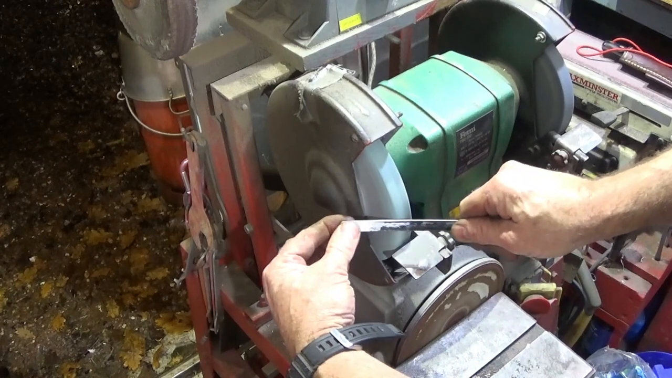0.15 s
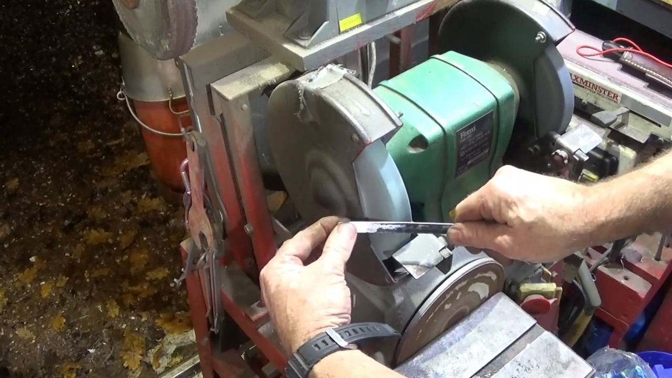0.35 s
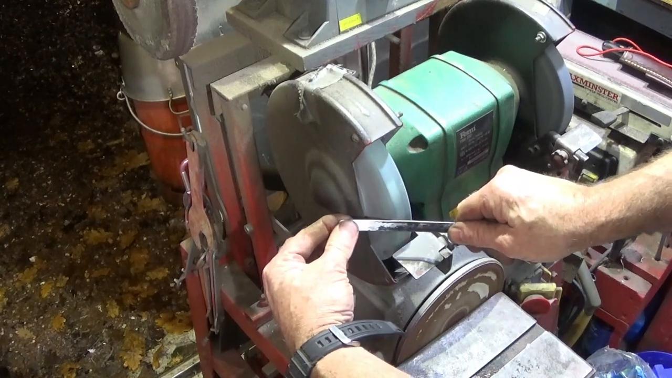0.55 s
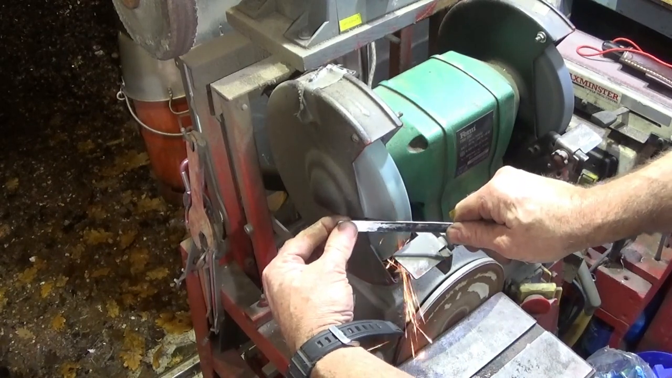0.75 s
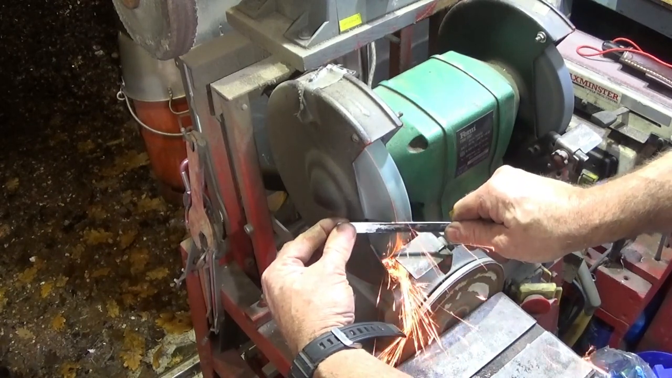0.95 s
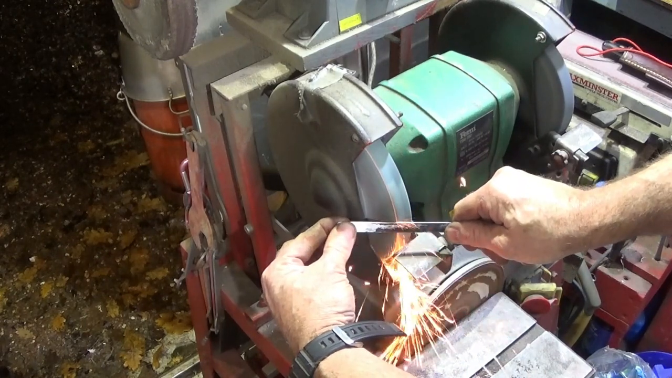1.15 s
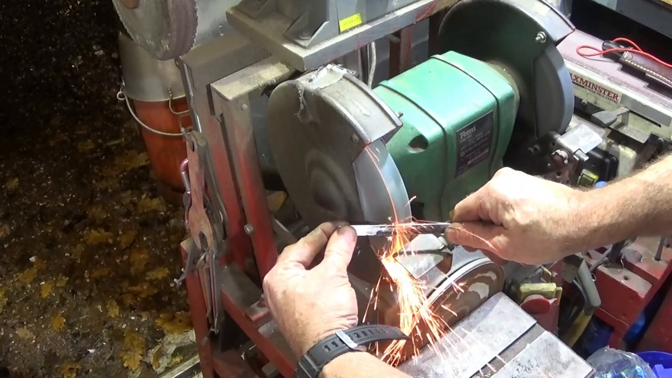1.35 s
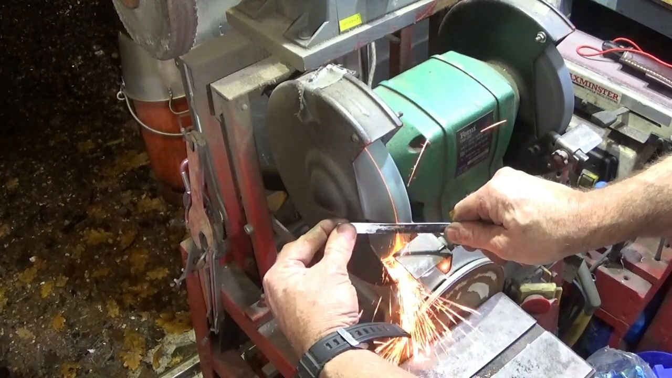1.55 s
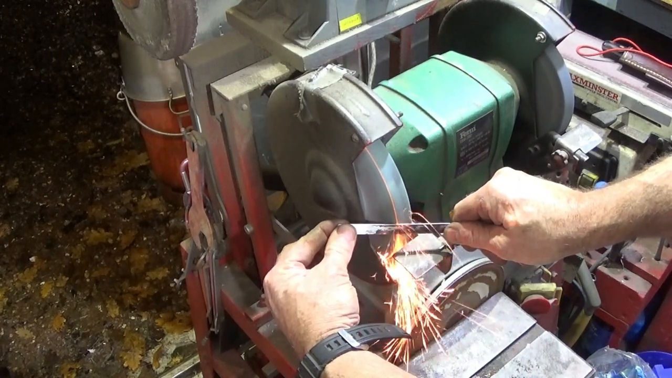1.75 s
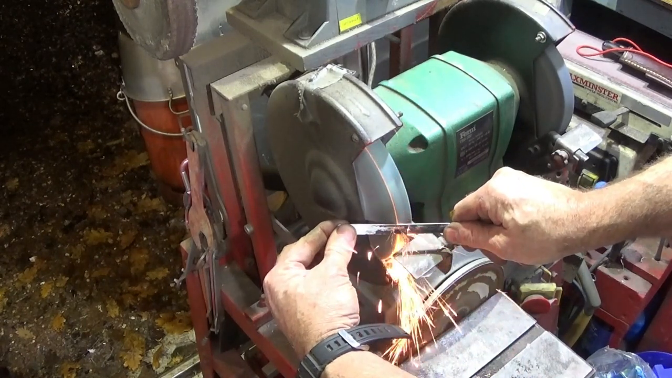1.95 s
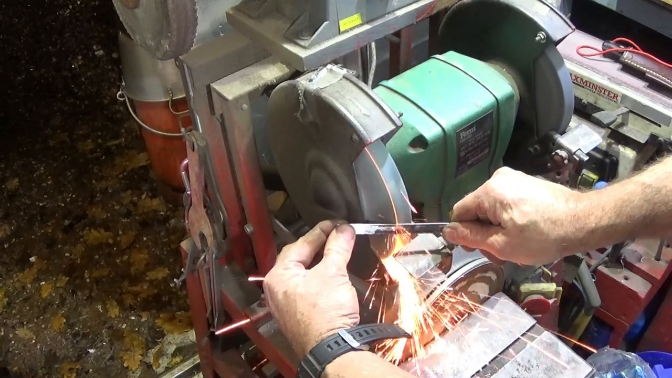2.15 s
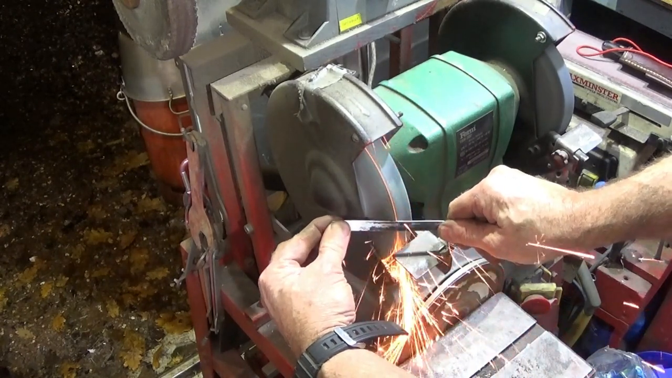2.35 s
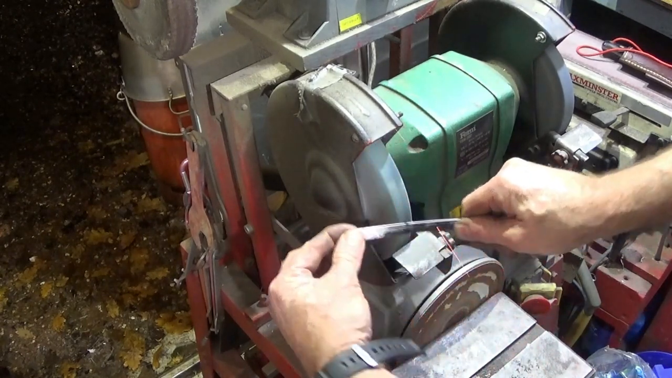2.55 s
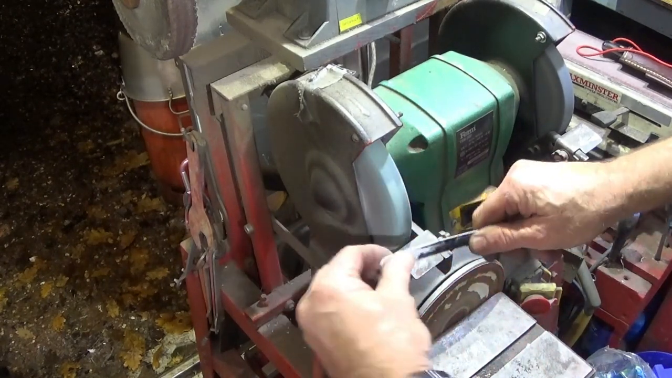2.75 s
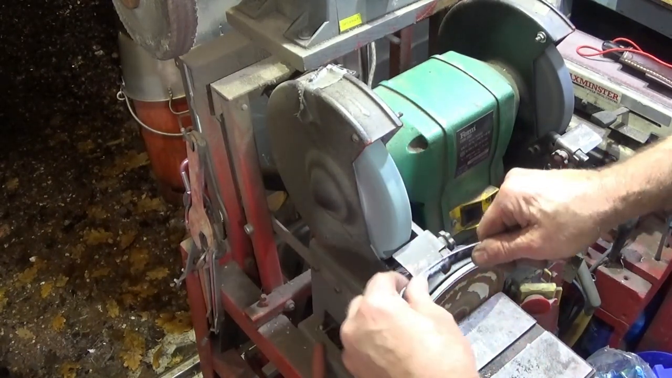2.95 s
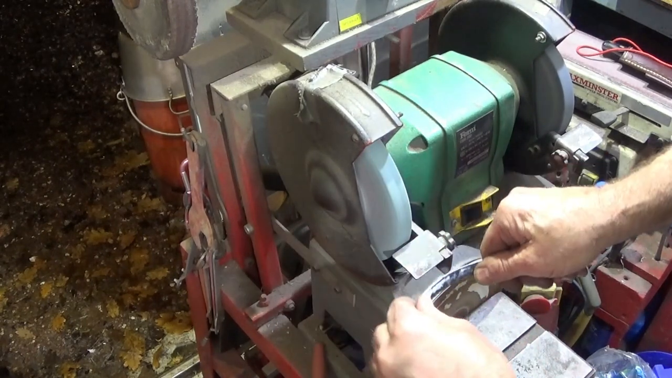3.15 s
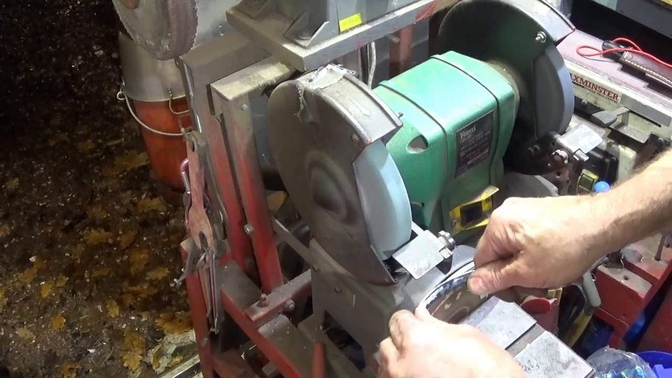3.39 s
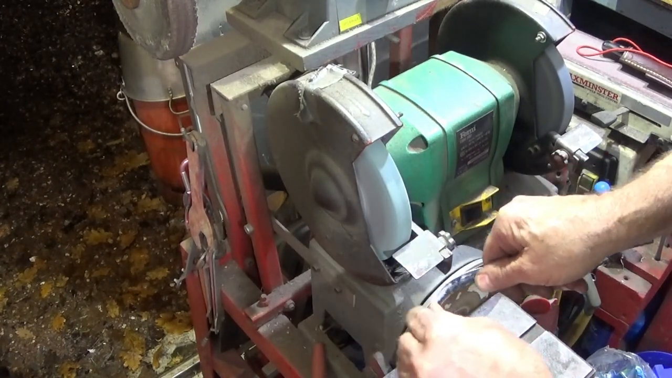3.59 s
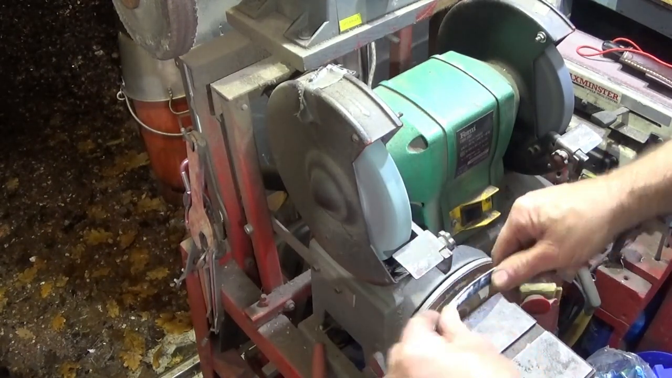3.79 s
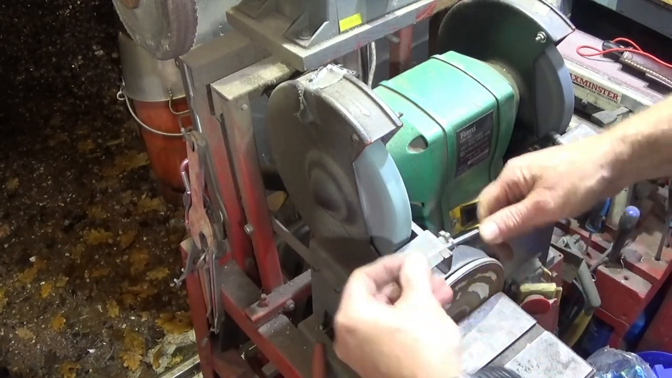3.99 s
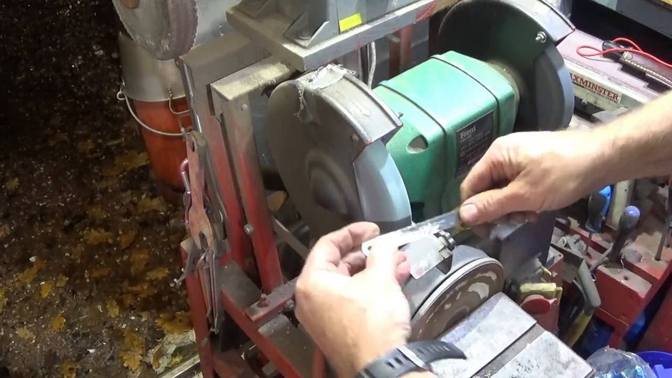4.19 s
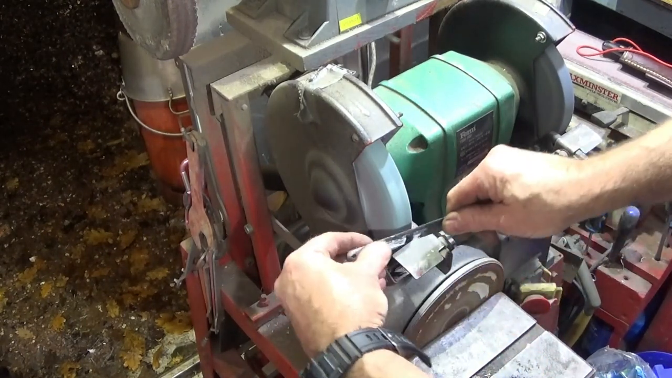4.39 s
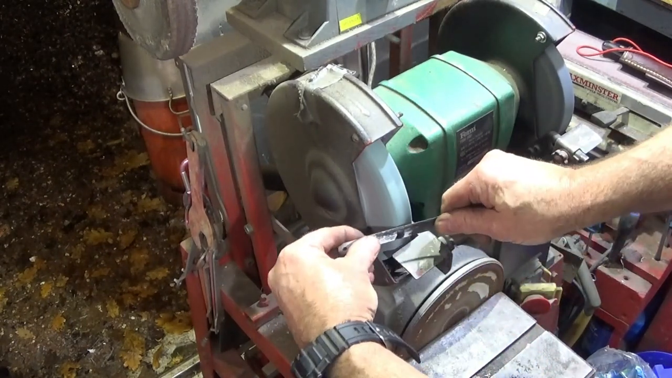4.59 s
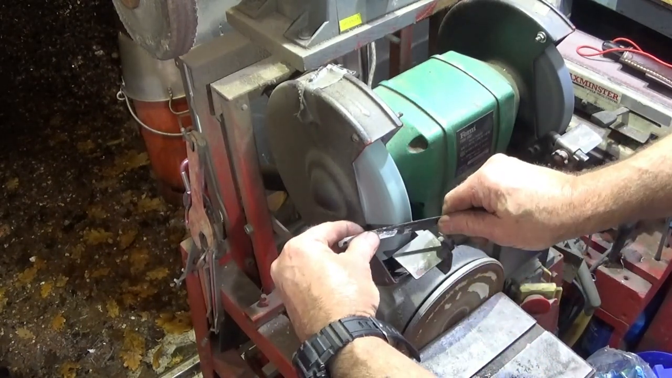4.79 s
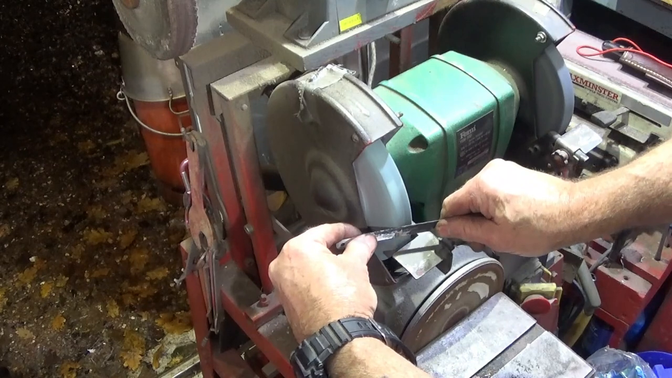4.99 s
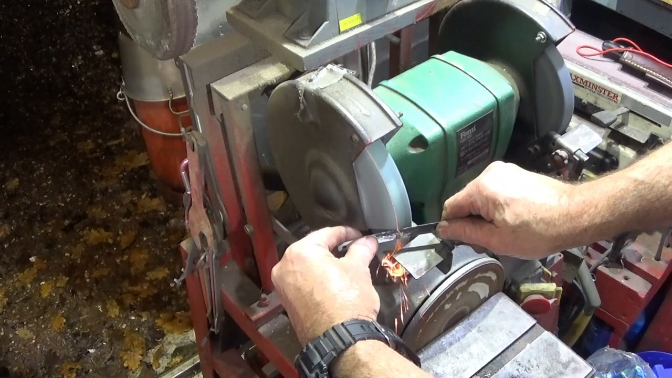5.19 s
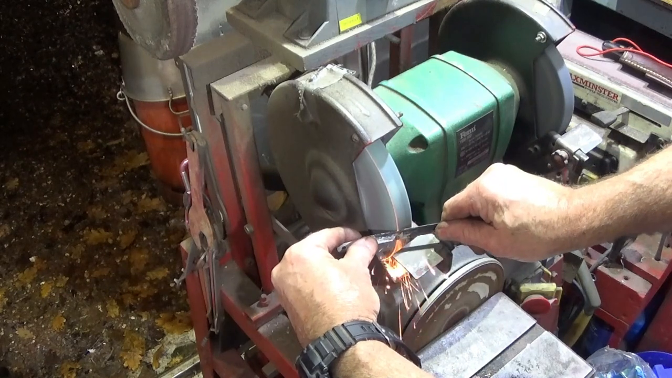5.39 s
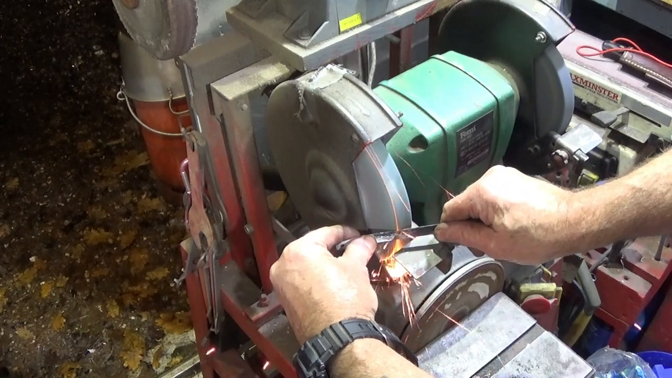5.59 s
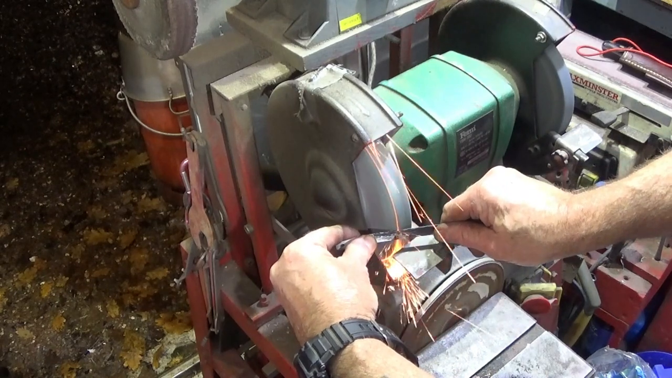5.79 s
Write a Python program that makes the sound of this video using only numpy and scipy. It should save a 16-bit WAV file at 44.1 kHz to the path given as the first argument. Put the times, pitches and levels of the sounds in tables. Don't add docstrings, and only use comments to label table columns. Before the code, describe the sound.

Close up in a small workshop: a rising, rough motor whine with dull clacks and tiny cracks, then a harsh high metallic hiss for nearly two seconds as steel is ground. The motor runs free with a low buzzing hum and light ticking for about two and a half seconds. A second, more piercing grind follows. The camera's automatic level ducks the motor; treble ends steeply, reflections are brief.

```python
import sys
import numpy as np
from scipy import signal
from scipy.fft import rfft, irfft, next_fast_len
from scipy.io import wavfile
from scipy.ndimage import uniform_filter1d, map_coordinates

SR = 44100
rng = np.random.default_rng(int(sys.argv[2]) if len(sys.argv) > 2 else 0)


def file_out(sig):
    cols = np.atleast_2d(sig).T
    lim = np.clip(cols, -1, 1)
    pcm = np.round(lim * 32767).astype(np.int16)
    wavfile.write(sys.argv[1], SR, pcm)


def natural_amplitude(level_db):
    exponent = np.asarray(level_db, float) / 20
    return 10 ** exponent


N = 257103
T = np.arange(N) / SR
M = next_fast_len(N + 8192)
HZ = np.fft.rfftfreq(M, 1 / SR)

# [t/s, pressure as hiss level/dB, share of grit pattern kept from the last turn 0-1]
PASSES = [
    [(0.729, -17, 0.8), (0.743, -17, 0.8), (1.195, -15.5, 0.82), (1.443, -21, 0.7), (1.573, -15.5, 0.93),
     (1.775, -23, 0.88), (2.523, -13.5, 0.81), (2.535, -18, 0.7)],
    [(5.115, -9.5, 0.56), (5.125, -17.5, 0.77), (5.407, -16, 1), (5.83, -17, 0.72)],
]


def unit(x):
    return x / np.sqrt(np.mean(x ** 2))


def curves(rows):
    s, *columns = np.transpose(rows)
    return [np.interp(T, s, c) for c in columns]


def spells(rows, rest_db):
    db = rest_db + sum((db - rest_db) * ((T >= start) & (T < end)) for start, end, db in rows)
    fade_s = 0.052
    return uniform_filter1d(db, int(fade_s * SR))


def shape(points):
    hz, db = np.transpose(points)
    return natural_amplitude(np.interp(np.log(HZ + 1), np.log(hz), db))


def filtered(x, gain):
    return irfft(rfft(x, M) * gain, M)[..., :N]


def colour(x, gain):
    return unit(filtered(x, gain))


def walk(rate, spread):
    knots = rng.standard_normal(int(N / SR * rate) + 2)
    return spread * map_coordinates(knots, [T[::64] * rate], order=3)


def sway(db, rate):
    return np.interp(T, T[::64], natural_amplitude(walk(rate, db)))


def rim(turns, kept, twice, lumpy_db, lumps=24):
    grit = 1024
    count = int(turns[-1]) + 2
    kept, twice = (np.interp(np.arange(count), turns, np.clip(v + 0 * T, 0, .97)) for v in (kept, twice))
    rows = rng.standard_normal((count, grit))
    for k in range(2, count):
        old = (1 - twice[k]) * rows[k - 1] + twice[k] * rows[k - 2]
        rows[k] = unit(kept[k] * old + np.sqrt(1 - kept[k] ** 2) * rows[k])
    spots = np.repeat(rng.standard_normal(64), grit // 64)
    spots = uniform_filter1d(spots, int(lumps), mode="wrap")
    return map_coordinates((rows * natural_amplitude(lumpy_db * spots)).ravel(), [turns * grit], order=3)


def hum(turns, orders, wobble_db):
    drift = turns + np.interp(T, T[::64], walk(4.12, 0.0016))
    total = 0
    for k, db in orders:
        tone = np.sin(2 * np.pi * (k * drift + rng.random()))
        total = total + natural_amplitude(db) * sway(wobble_db * min(k / 4, 1), 4.6) * tone
    return unit(total)


def partials(turns, orders, levels_db):
    return [np.sqrt(2) * natural_amplitude(db) * np.sin(2 * np.pi * (k * turns + rng.random()))
            for k, db in zip(orders, levels_db)]


def strain():
    # [t/s, level/dB]
    whine = [(0.0, -29.5), (0.138, -28), (0.186, -26), (0.33, -25.5), (0.43, -21), (0.5, -23.5),
             (0.72, -24)]
    return curves(whine)[0]


def crossing(hz):
    # [f/Hz, width/Hz, level/dB]
    slip = [(119, 14, -47)]
    power = sum(natural_amplitude(2 * db) / (1 + (2 * (hz - mode) / width) ** 4) for mode, width, db in slip)
    return 10 * np.log10(power + 1e-6)


def run_up(turns, speed_hz):
    # [f/Hz, level/dB]
    resonances = [(26, -43), (45, -29), (86, -33), (113, -22), (152, -29), (190, -20.5), (226, -30),
                  (419, 2), (529, -20), (570, -19), (650, 1.5), (753, -7), (846, 1), (1050, -8.5),
                  (1500, -10), (1950, -39), (3300, -120)]
    # [t/s, level/dB]
    shudder = [(0, 0.5), (.075, 4), (.15, -2), (.23, -1), (.33, -5), (.48, 3.5), (.54, 0.5), (.62, 2),
               (.72, 2.5)]
    slip_orders = 3, 21, 24, 27
    # [start t/s, end t/s, level/dB]
    catches = [
        [(.17, .31, -24), (.57, .67, -25.5)],
        [(-.1, .13, -25.5), (.29, .46, -24.5), (.46, .56, -31)],
        [(.15, .26, -25), (.31, .4, -27), (.44, .55, -33.5)],
    ]
    db = strain()
    housing_db = -23.5 + 0.19 * (db + 23.5) + 4 * T + curves(shudder)[0]
    low = 1 / (1 + (HZ / 520) ** 12)
    rough = rim(turns, 0.82, 0, 1.9) * sway(0.82, 26.7)
    boom = natural_amplitude(housing_db + 1.5) * colour(rough, shape(resonances) * low)
    rough = rim(turns, 0.59, 0, 3.8) * sway(0.88, 23.7)
    whine = natural_amplitude(db - 2.5) * colour(rough, shape(resonances) * (1 - low))
    levels_db = [crossing(slip_orders[0] * speed_hz)] + [spells(rows, -39.5) for rows in catches]
    knocks = sum(line * sway(3.5, 50) for line in partials(turns, slip_orders, levels_db))
    return (boom + whine + knocks) * np.clip((.745 - T) / 0.035, 0, 1)


def heard():
    # [from t/s, guards level/dB, creep in dB/s]
    gain_steps = [
        (.74, -44, 1.5),
        (2.36, -47, 21),
        (2.55, -42, -5),
        (2.615, -40.5, 3),
        (5.116, -41, -1.5),
    ]
    # [start t/s, end t/s, level/dB]
    swell = [(2.6, 3.05, 2), (3.2, 3.45, 1), (4.6, 4.9, 0)]
    guard_db = strain() - 10
    for s, db, creep in gain_steps:
        guard_db = np.where(T < s, guard_db, db + creep * (T - s))
    touch = sum((T > rows[0][0]) & (T < rows[-1][0]) for rows in PASSES)
    settle_db = 17 * np.exp(-np.clip(T - gain_steps[0][0], 0, None) / 0.094)
    housing_db = guard_db + np.where(touch, 3.5, 6) + settle_db + spells(swell, 0.)
    airy_db = np.where(touch, 2.5, 3)
    return uniform_filter1d(np.array([guard_db, housing_db, airy_db]), size=SR // 40)


def motor(turns, speed_hz):
    # [multiple of shaft speed, level/dB]
    free_orders = [(1, -17), (2, -28.5), (3, -18.5), (4, -9), (5, -41), (6, -10), (7, 2), (8, 2.5),
                   (9, 0.5), (10, -11), (11, -13), (12, -19), (13, -5), (14, -5), (15, -11), (16, -14),
                   (17, -3.5), (18, -10.5), (19, -44), (20, -16), (21, -26), (22, -6), (23, -32), (24, -38),
                   (25, -22), (26, -16), (27, -47), (28, -8), (29, -21), (30, -35)]
    loaded_orders = [(1, -4), (2, -48), (3, -8), (4, -8), (5, -6), (6, 4.5), (7, -7)]
    # [f/Hz, level/dB]
    housing = [(15, -55), (25, -39), (58, -25), (97, -44), (198, -25.5), (242, -21.5), (372, -1.5),
               (455, -0.5), (539, -41.5), (649, -12.5), (844, -16), (898, -29), (1000, -33), (1300, -52),
               (2200, -120)]
    guards = [(350, -25), (600, -12.5), (638, -9.5), (790, -11), (863, -11), (995, -5), (1080, -6.5),
              (1560, -4.5), (1690, -7.5), (1830, -5.5), (5000, -14.5), (6500, -49), (11000, -120)]
    tick_colour = [(1470, -35), (2500, 2), (3100, -3.5), (3750, -4), (4080, -9.5), (5410, -10.5),
                   (6340, -5.5), (7280, -9), (7620, -15), (7980, -15), (10700, -10), (11400, -13.5),
                   (12300, -22), (14800, -32.5), (15500, -49)]
    sing_orders = 8, 20, 34
    # [start t/s, end t/s, level/dB]
    sing = [
        [(.97, 1.4, -38), (1.4, 1.95, -32), (1.95, 2.25, -36), (2.25, 2.6, -40.5), (2.6, 2.97, -31.5),
         (5.63, 5.9, -50)],
        [(1.05, 1.74, -43), (1.74, 1.92, -37.5), (1.95, 2.18, -38), (2.23, 2.55, -40), (5.33, 5.62, -46),
         (5.62, 5.9, -41.5)],
        [(2.66, 3.33, -45), (3.45, 3.86, -39), (3.86, 4.47, -37), (4.47, 5.15, -52)],
    ]
    guard_db, housing_db, airy_db = heard()
    at_speed = np.clip((T - .7) / 0.1, 0, 1)
    resonant_hz, resonant_width_hz = 48.59, 0.45
    tuned = 1 / (1 + ((speed_hz - resonant_hz) / resonant_width_hz) ** 4)
    free = np.clip((speed_hz - 48.2) / 1.7, .1, 1)
    lines = free * natural_amplitude(-0.7) * hum(turns, free_orders, 1.3)
    lines = lines + tuned * natural_amplitude(-16.0) * hum(turns, loaded_orders, 0.86)
    sing_db = [spells(rows, -57.5) for rows in sing]
    low_line, mid_line, whine = partials(turns, sing_orders, sing_db)
    singing = tuned ** 0.26 * (speed_hz > 46.5) * (low_line * tuned + mid_line)
    singing = singing + free * at_speed * whine
    boom = colour(rim(turns, 0.55, 0.59, 0.46), shape(housing))
    boom = boom * natural_amplitude(0.32 - 0.97 * tuned) * sway(0.31, 16)
    low = 1 / (1 + (HZ / 3500) ** 6)
    mode = 1 + 0.76 * natural_amplitude(6) / (1 + (2 * (HZ - 1734) / 27) ** 2)
    rough = rim(turns, 0.56 + 0.22 * tuned, 0.69 * (1 - tuned), 2.2)
    buzz = colour(rough, shape(guards) * mode * low)
    knock = 0.5 + 0.58 * np.exp(-(turns % 1) / 0.1) * sway(5, 30) * at_speed
    ticks = colour(rng.standard_normal(N) * knock, shape(tick_colour) * (1 - low))
    ticks = ticks - 0.65 * (1 - at_speed) * filtered(ticks, 1 / (1 + (10500 / (HZ + 1)) ** 16))
    rattling = natural_amplitude(5.0 - 2 * (1 - at_speed)) * buzz + natural_amplitude(airy_db + 0.5) * ticks
    return singing + at_speed * natural_amplitude(housing_db) * (lines + boom) + natural_amplitude(guard_db) * rattling


def rattles():
    # [t/s, peak level/dB]
    clacks = [(0.019, -19), (0.0364, -28), (0.059, -17.5), (0.1206, -19), (0.1394, -18), (0.1624, -20),
              (0.179, -18), (0.2179, -19), (0.2523, -16.5), (0.3474, -20), (0.3754, -18), (0.4004, -17),
              (0.4344, -12.5), (0.464, -14), (0.4933, -18), (0.5164, -13.5), (0.5437, -18), (0.5714, -17),
              (0.5994, -17), (0.6374, -19), (0.6706, -15), (0.685, -16.5)]
    strike = sum(natural_amplitude(db - 8) * np.exp(-np.clip(T - s, 0, .2) / 0.007) * (T >= s) for s, db in clacks)
    dull = [(1200, -30), (2200, 1), (4000, -0.5), (6300, 0.5), (8000, -5), (11000, -8), (15500, -30)]
    return strike * colour(rng.standard_normal(N), shape(dull))


def snaps():
    # [t/s, peak level/dB]
    cracks = [(0.1201, -36), (0.1301, -32), (0.163, -28), (0.1974, -26), (0.2478, -34), (0.3476, -28),
              (0.3765, -32), (0.402, -32), (0.4289, -33), (0.4638, -35), (0.4918, -33), (0.5167, -27),
              (0.5896, -14), (0.6459, -25), (0.6694, -39), (0.7357, -16)]
    strike = sum(natural_amplitude(db - 2) * np.exp(-np.clip(T - s, 0, .1) / 0.0011) * (T >= s) for s, db in cracks)
    return filtered(strike * rng.standard_normal(N), 1 / (1 + (7500 / (HZ + 1)) ** 4))


def blade(grit, spectrum, modes, ring_db):
    body = colour(grit, shape(spectrum))
    ring = sum(natural_amplitude(db) * sway(0.42, 6.8) * signal.lfilter(*signal.iirpeak(hz, hz / width, SR), body)
               for hz, width, db in modes)
    return body + natural_amplitude(ring_db) * unit(ring)


def grind(turns, rows, spectra, modes):
    # [start t/s, end t/s, level/dB]
    grip = [(.7, 1.06, -1), (1.27, 1.46, -0.5)]
    hiss_db, kept = curves(rows)
    start, end = rows[0][0], rows[-1][0]
    touch = np.clip((T - start) / 0.011 + 0.48, 0, 1) * np.exp(-np.clip(T - end, 0, None) / 0.0087)
    during = (T > start) & (T < end)
    grit = rim(turns, kept, 0, 2.25, 2.7) * sway(0.6, 30)
    grit = grit + 0.35 * filtered(rng.standard_normal(N), 1 / (1 + (9500 / (HZ + 1)) ** 6))
    slide = np.clip((T - start) / (end - start) * 2.5 - .6, 0, 1)
    both = (1 - slide) * blade(grit, spectra[0], modes[0], -8.5)
    both = both + slide * blade(grit, spectra[1], modes[1], -8.5)
    edge = filtered(both, 1 / (1 + (8500 / (HZ + 1)) ** 8))
    spine = filtered(both, 1 / (1 + (HZ / 5900) ** 16))
    eased_db = hiss_db[during].mean() - hiss_db
    edge_lift = natural_amplitude(1.17 * eased_db) - 1
    spine_lift = natural_amplitude(0.8 * eased_db + spells(grip, 0.)) - 1
    return natural_amplitude(hiss_db - 3.0) * touch * (both + edge_lift * edge + spine_lift * spine)


def squeal(turns):
    # [start t/s, end t/s, f/Hz, width/Hz, level/dB, change in dB/s]
    cries = [(.8, 1.3, 5640, 90, -40, -2), (1.084, 1.41, 5040, 250, -43, 0),
             (1.203, 2.2, 6250, 60, -37.5, 0), (1.467, 2.16, 4580, 500, -37.5, -2),
             (1.47, 2.16, 5050, 120, -43, -4), (2.304, 2.53, 4040, 300, -40, 4),
             (5.118, 5.65, 5624, 260, -25.5, -12), (5.136, 5.9, 4055, 200, -38, 2.5),
             (5.2, 5.9, 4260, 50, -45, -1), (5.3, 5.9, 3580, 120, -45, 3),
             (5.635, 5.9, 2270, 352, -41.5, 25)]
    high_sides = 1 + 0.14 * np.cos(2 * np.pi * turns) + 0.55 * np.cos(4 * np.pi * turns)
    grit = rim(turns, 0.83, 0, 0.8) * high_sides
    total = 0
    for s, end, hz, width, db, rate in cries:
        level = natural_amplitude(db + rate * np.clip(T - s, 0, None))
        fade = np.clip((T - s) / 0.0084 + 1, 0, 1) * np.clip((end - T) / .02, 0, 1)
        total = total + level * fade * colour(grit, 1 / (1 + (2 * (HZ - hz) / width) ** 4))
    return total


def chatter(turns):
    # [start t/s, end t/s, level/dB]
    shaking = [(.9, 1.3, -48.5), (1.48, 2.18, -41), (2.23, 2.36, -54)]
    # [multiple of shaft speed, level/dB]
    shaking_orders = [(25, -0.5), (30, -3.5), (36, -15), (41, -2), (44, -6), (50, -2.5), (54, -9), (57, -1),
                      (61, -10), (69, -3)]
    return natural_amplitude(spells(shaking, -68)) * hum(turns, shaking_orders, 1.1)


def scene():
    # [t/s, turns per second f/Hz]
    shaft = [(0, 26.93), (.431, 35.37), (.616, 40.12), (.739, 42.79), (.83, 45.2), (.95, 47), (1.1, 47.9),
             (1.25, 48.27), (1.4, 48.39), (2.53, 48.39), (2.62, 48.9), (2.8, 49.4), (3.05, 49.62),
             (3.4, 49.71), (5.11, 49.74), (5.3, 49.57), (5.6, 49.05), (5.83, 48.7)]
    # [f/Hz, level/dB]
    blade_colours = [
        ([(1470, -25.5), (2500, -23), (3760, -18.5), (4880, -7.5), (5350, -13), (6100, -4), (6900, -4), (8230, -5.5), (9750, 1.5), (11500, -3), (13700, -17.5), (15700, -12)], [(1470, -29), (2500, -17), (3790, -14), (4660, -3.5), (5520, -9.5), (6240, -2), (6900, 1.5), (8040, -2), (8890, 4), (11200, -1), (13700, -13), (15700, -11.5)]),
        ([(1180, -56.5), (2000, -55), (3270, -20), (3920, -16), (5210, -11), (5580, -9), (6520, -13.5), (7680, 3.5), (8890, -10.5), (10400, -3), (11700, -16.5), (15700, -25)], [(1000, -45), (1700, -27), (1900, -45), (2130, -25), (3260, -18), (4110, -9), (4470, -9), (5800, -0.5), (6310, -8), (7600, 6.5), (12200, -11.5), (15700, -11)]),
    ]
    # [f/Hz, width/Hz, level/dB]
    blade_rings = [
        ([(5900, 31, -0.5), (6260, 120, -8), (6840, 84, -2.5), (8590, 43, -5), (9470, 110, -10), (9900, 130, -15), (10500, 49, -9)], [(6300, 120, -0.5), (7070, 1100, -5), (7040, 14, 9), (8130, 23, -1), (9300, 25, -3), (10300, 27, -15), (11450, 410, -3)]),
        ([(7230, 44, 0), (7800, 28, -16), (8070, 73, -5), (8500, 19, -9), (9000, 30, -2), (9600, 41, -9), (10310, 100, -4)], [(4100, 34, -19), (5740, 140, -20), (6700, 40, -12), (7360, 75, 3), (7960, 79, -6), (9660, 150, 0), (10300, 100, 2)]),
    ]
    # [f/Hz, level/dB]
    echo_colour = [(60, -28), (110, -11), (200, -12.5), (380, -19.5), (700, -7), (1290, -11.5),
                   (2380, -9.5), (4400, -10.5), (8120, -14.5), (15000, -13.5)]
    left_right = [(60, 1), (110, 9), (200, 2.5), (380, 1.5), (700, -2), (1290, 0.5), (2380, -0.5),
                  (4400, -1.5), (8120, 0), (15000, -3.5)]
    speed_hz, = curves(shaft)
    turns = np.cumsum(speed_hz) / SR
    machine = run_up(turns, speed_hz) + motor(turns, speed_hz) + rattles() + snaps() + chatter(turns)
    hiss = sum(grind(turns, *p) for p in zip(PASSES, blade_colours, blade_rings)) + squeal(turns)
    walls = rng.standard_normal(8192) * np.exp(-T[:8192] / 0.014)
    echo = rfft(walls / np.sqrt(np.sum(walls ** 2)), M) * shape(echo_colour)
    side = filtered(natural_amplitude(-0.3) * machine + natural_amplitude(-1.5) * hiss, echo)
    lean = np.sqrt(shape(left_right))
    return np.array([filtered(machine + hiss, lean) + side, filtered(machine + hiss, 1 / lean) - side])


def roll_off(x):
    return signal.sosfilt(signal.butter(12, 16100, fs=SR, output="sos"), x)


def record(dry):
    # [start t/s, end t/s, (low f/Hz, high f/Hz), (low f/Hz, high f/Hz)]
    narrowed = [
        (.76, 2.52, (0, 290), (1550, 5600)),
        (5.16, 5.9, (0, 290), (1900, 5200)),
    ]
    mid, side = (dry[0] + dry[1]) / 2, (dry[0] - dry[1]) / 2
    for start, end, *bands in narrowed:
        busy = uniform_filter1d(1. * ((T > start) & (T < end)), size=SR // 40)
        side = side - busy * filtered(side, sum((HZ >= lo) & (HZ < hi) for lo, hi in bands))
    touch = sum((T > p[0][0]) & (T < p[-1][0]) for p in PASSES)
    free = uniform_filter1d(1. - touch, size=SR // 40)
    mid = mid - free * filtered(mid, HZ > 15100)
    cut = filtered(np.array([mid + side, mid - side]), 1 / (1 + (HZ / 15850) ** 200))
    return roll_off(cut)


dry = scene()
out = record(dry)
file_out(out)
```